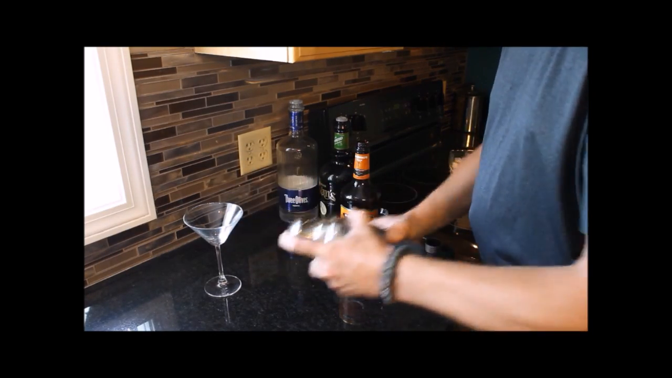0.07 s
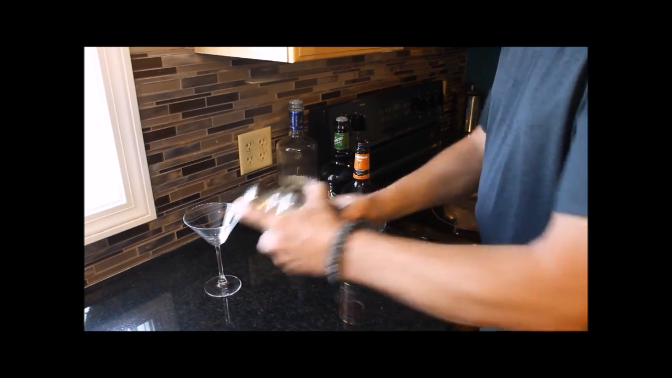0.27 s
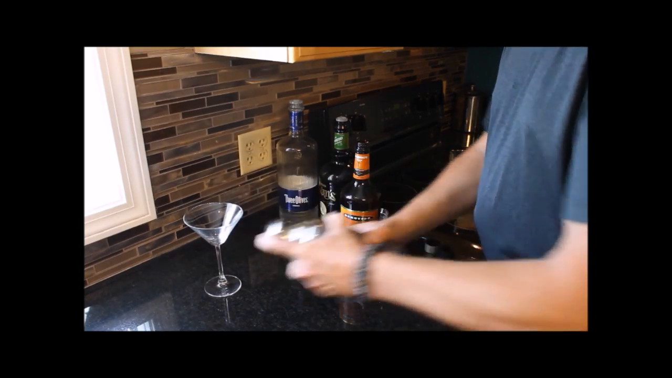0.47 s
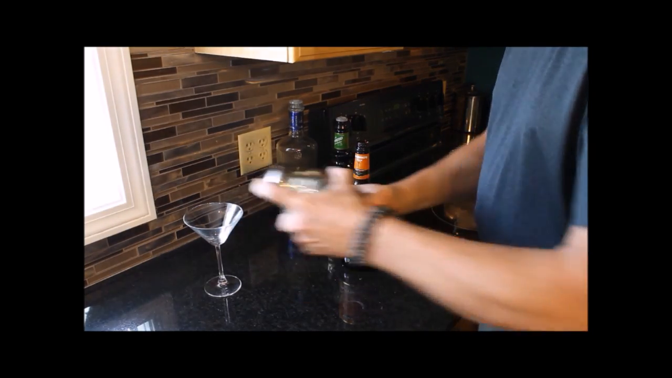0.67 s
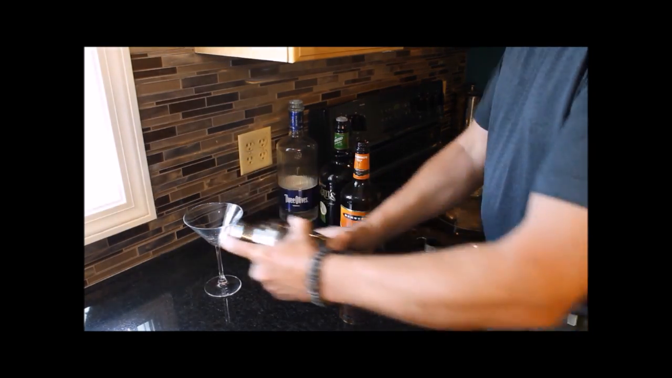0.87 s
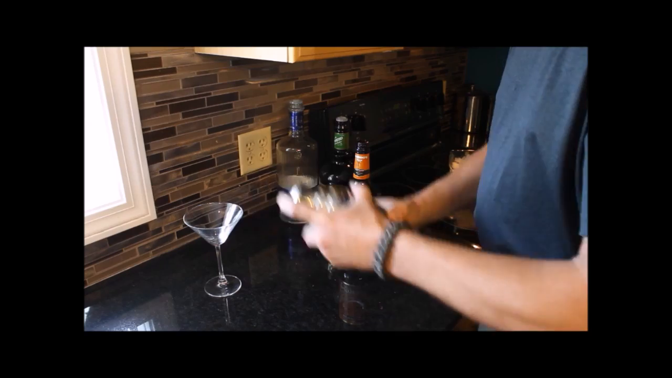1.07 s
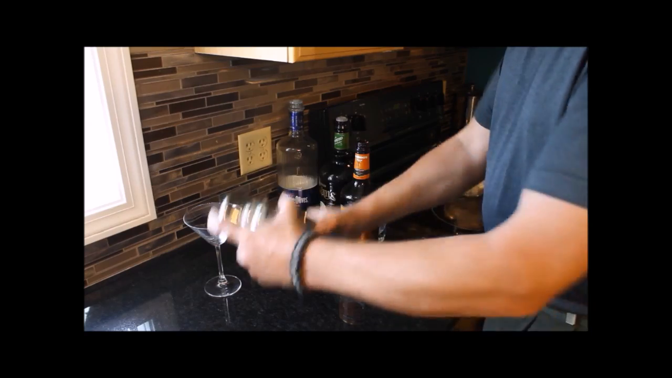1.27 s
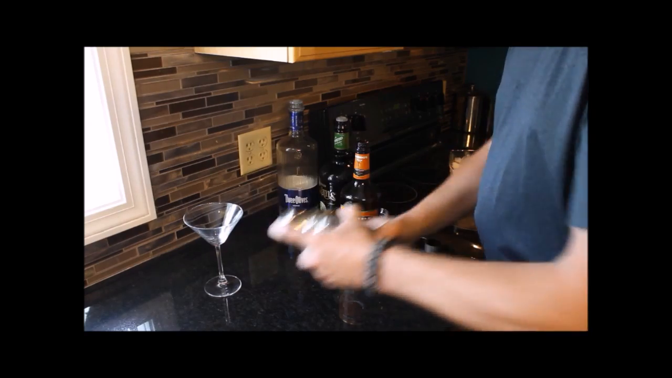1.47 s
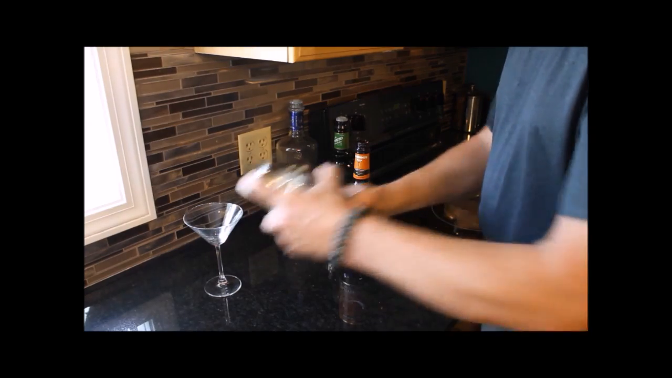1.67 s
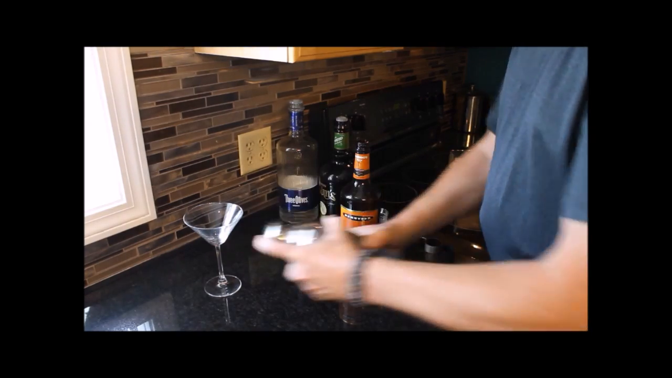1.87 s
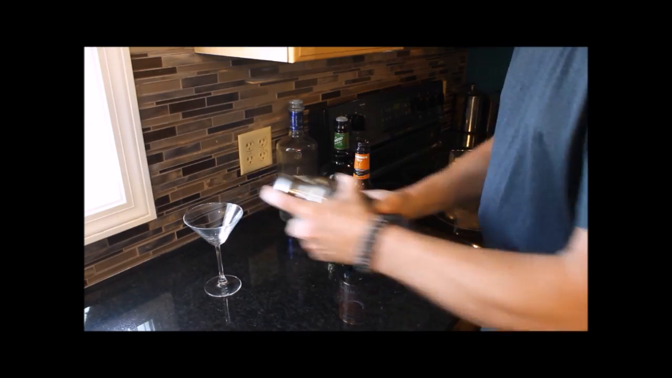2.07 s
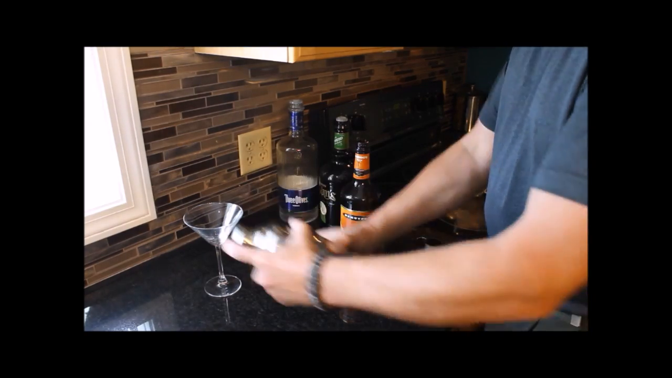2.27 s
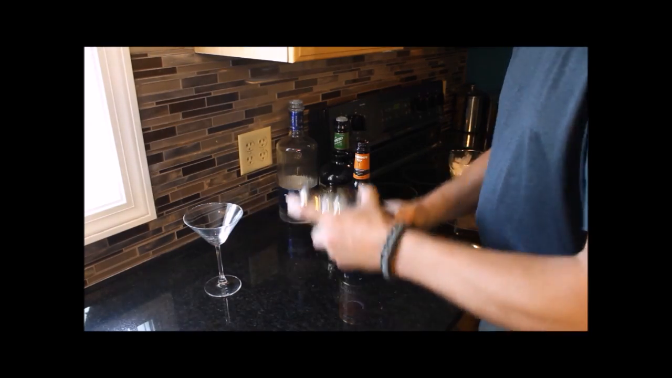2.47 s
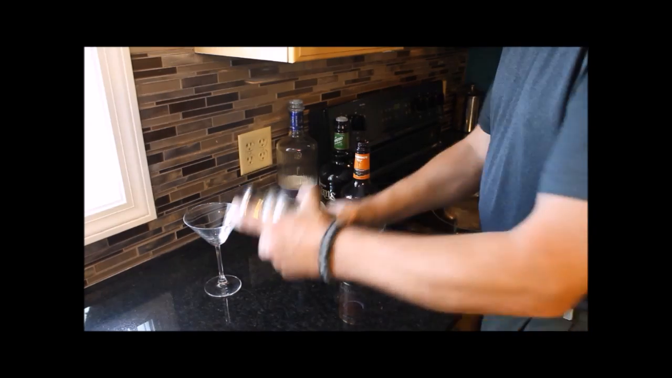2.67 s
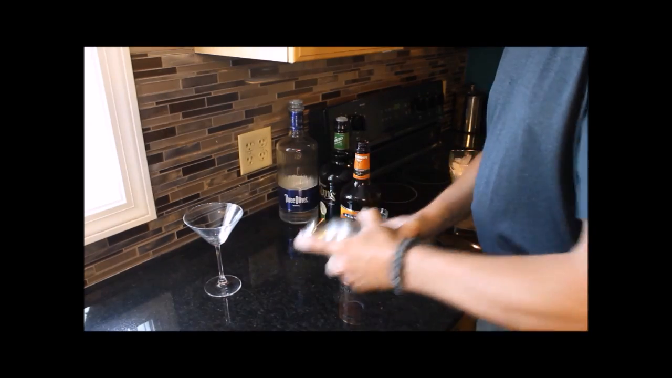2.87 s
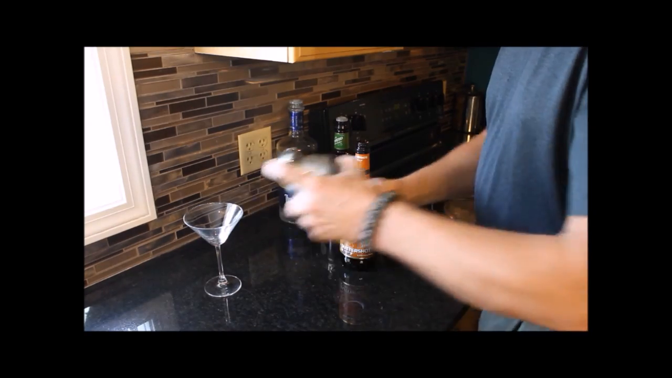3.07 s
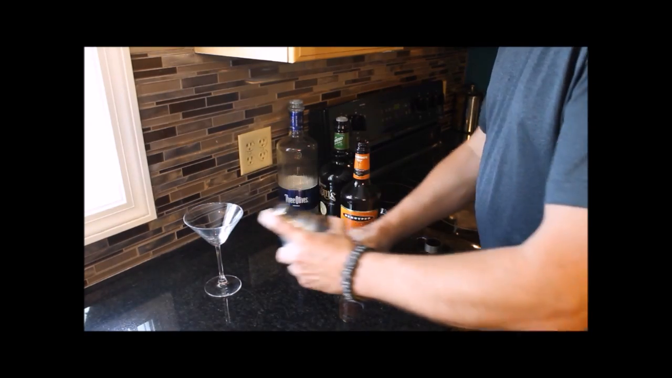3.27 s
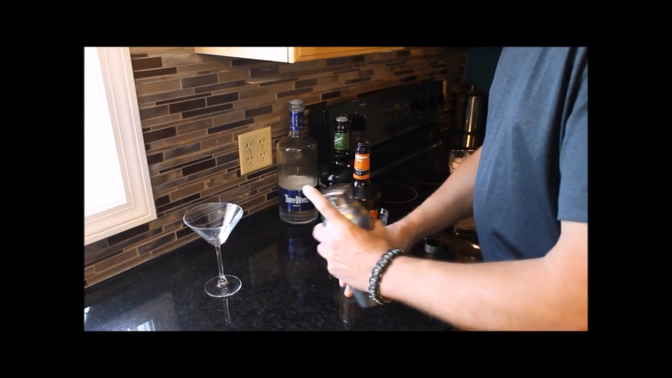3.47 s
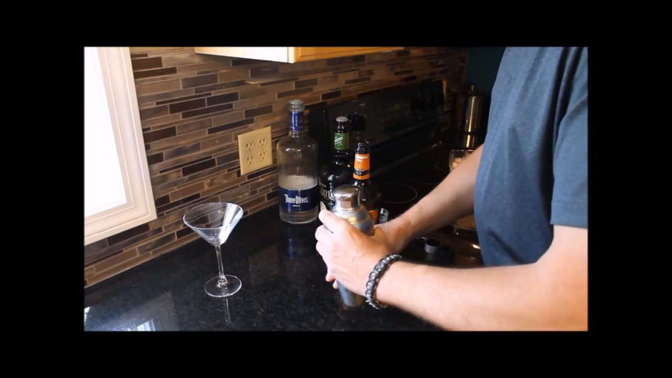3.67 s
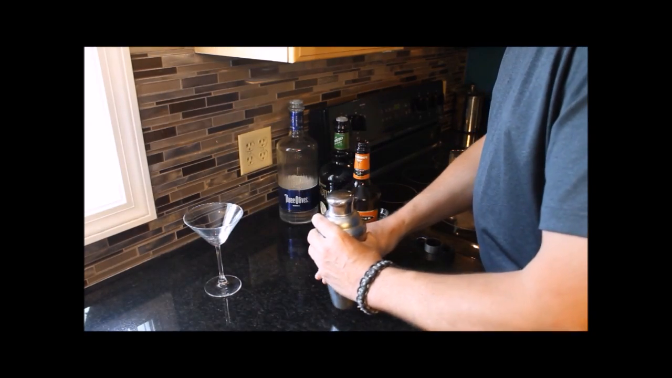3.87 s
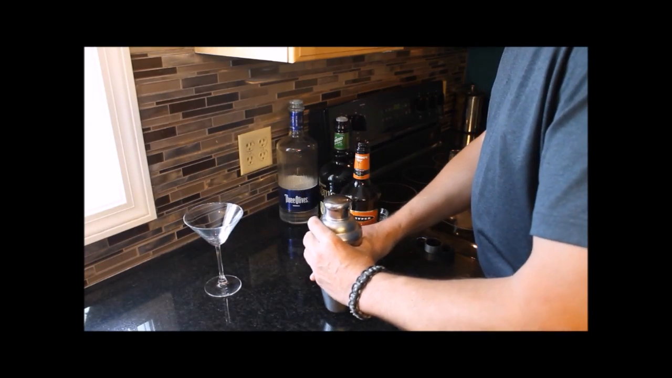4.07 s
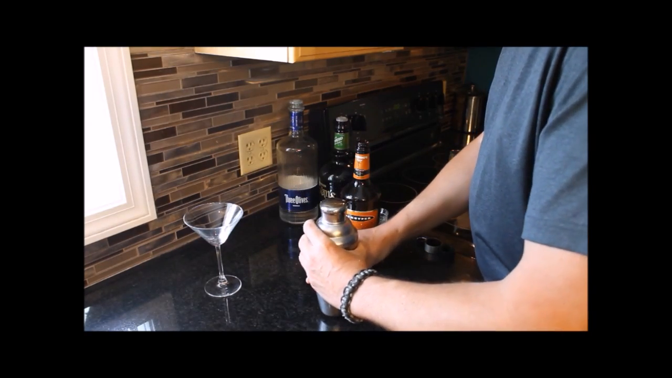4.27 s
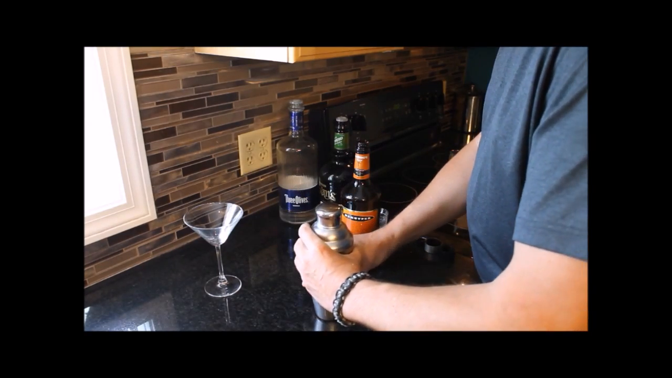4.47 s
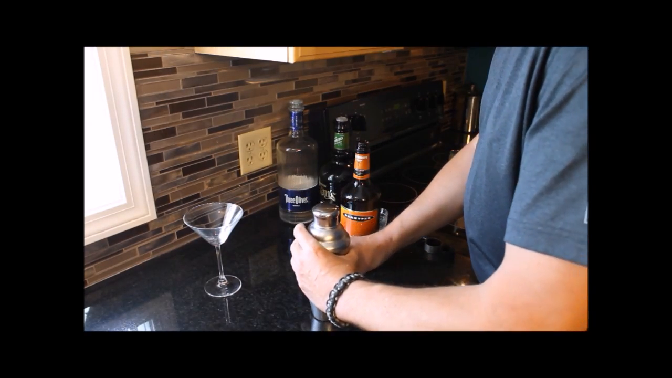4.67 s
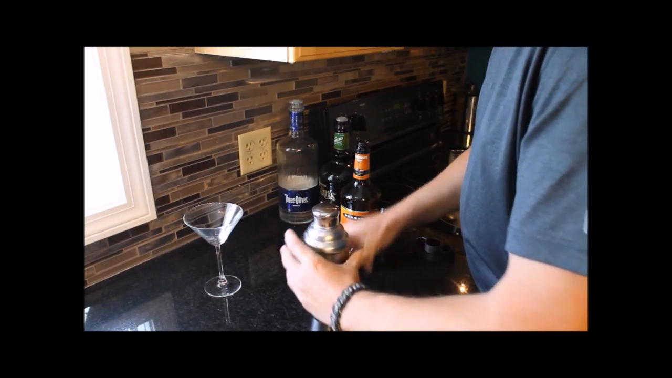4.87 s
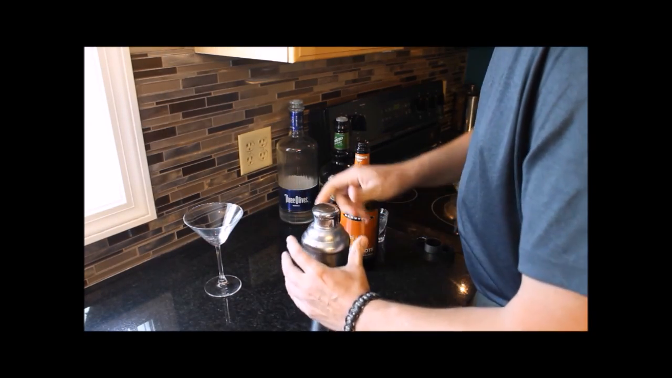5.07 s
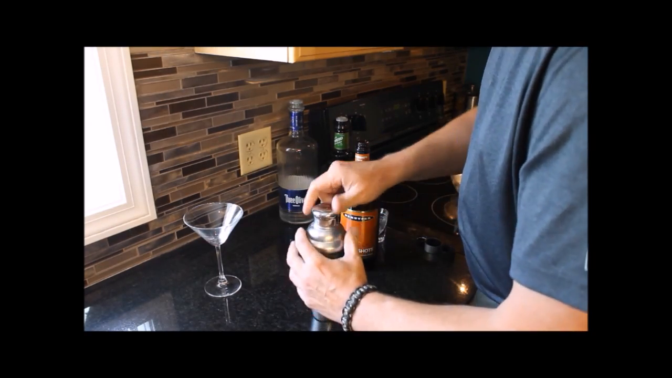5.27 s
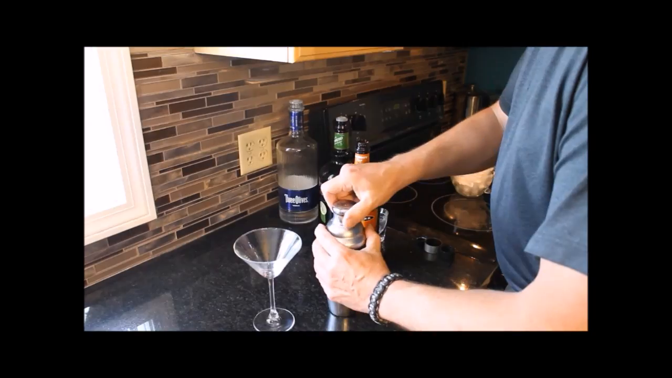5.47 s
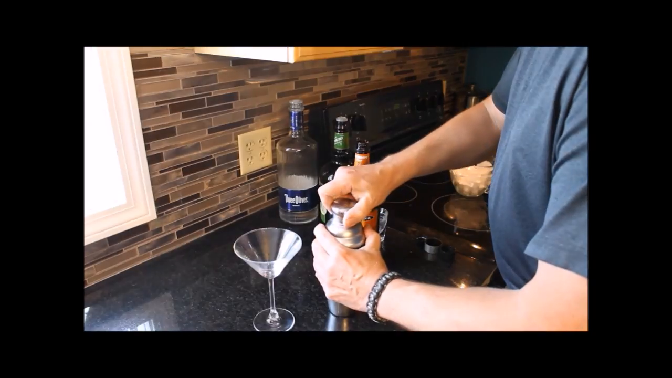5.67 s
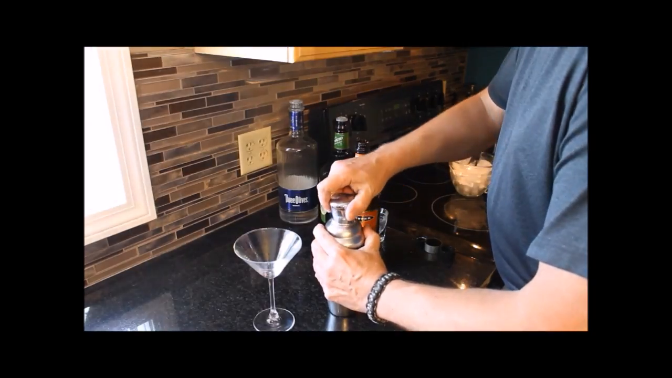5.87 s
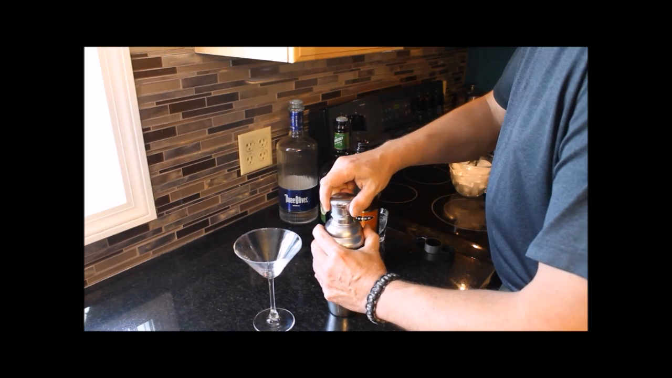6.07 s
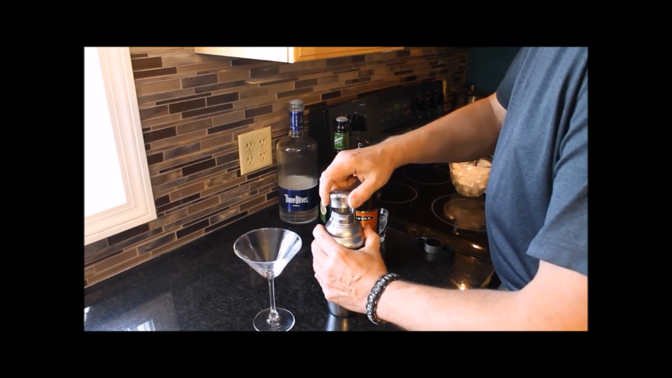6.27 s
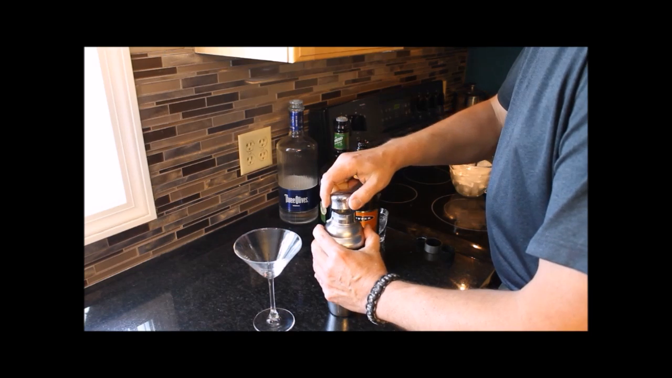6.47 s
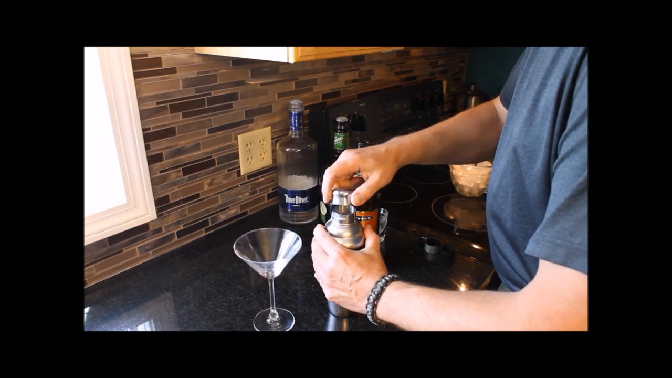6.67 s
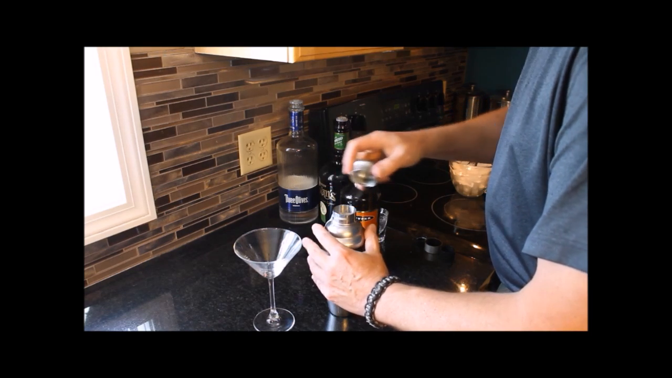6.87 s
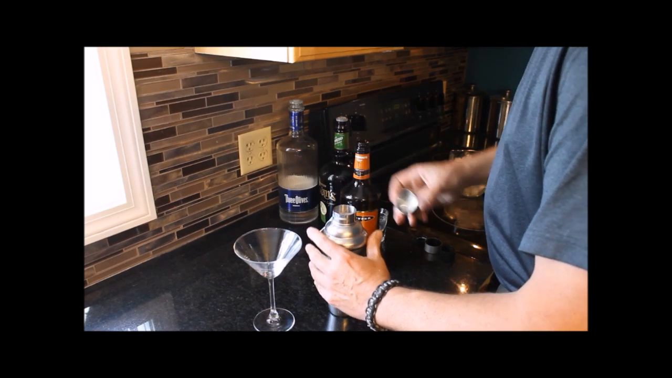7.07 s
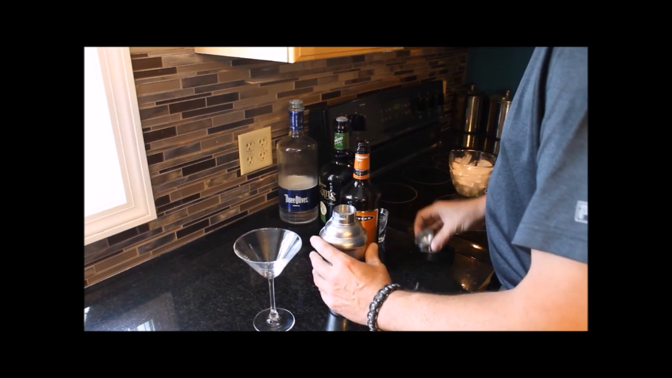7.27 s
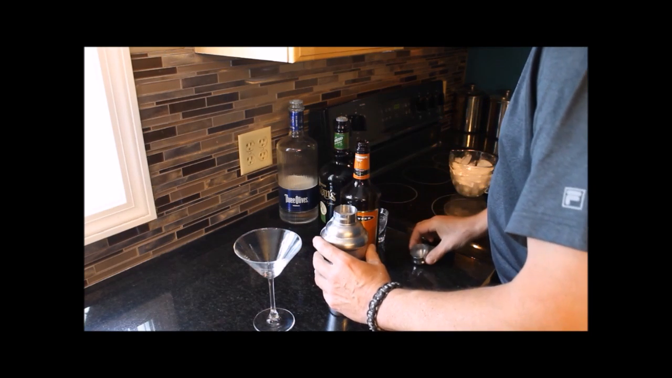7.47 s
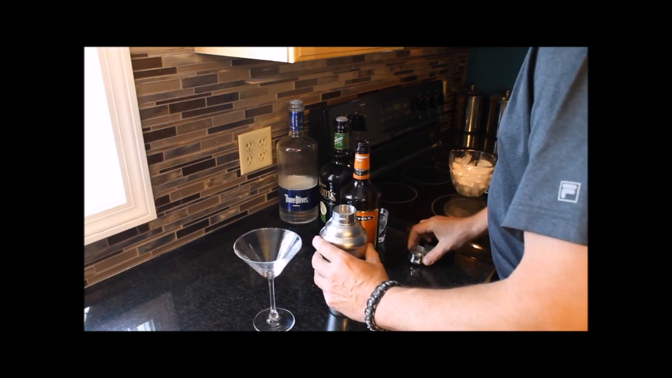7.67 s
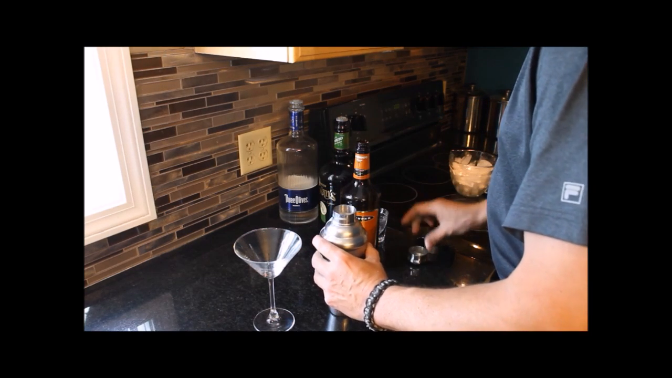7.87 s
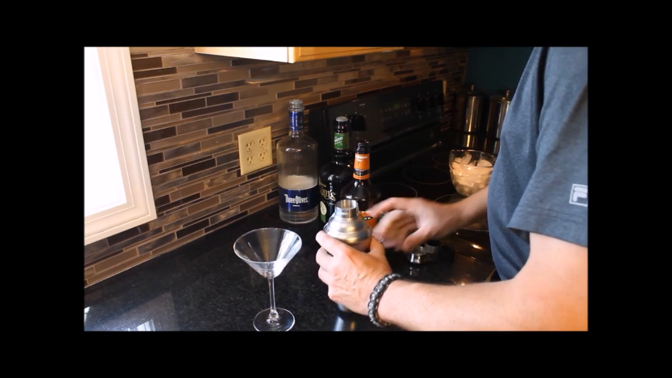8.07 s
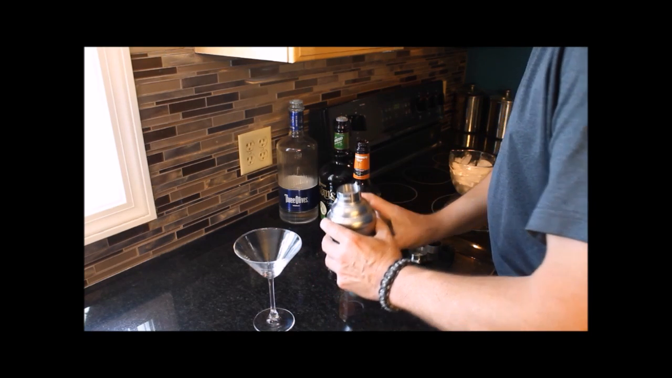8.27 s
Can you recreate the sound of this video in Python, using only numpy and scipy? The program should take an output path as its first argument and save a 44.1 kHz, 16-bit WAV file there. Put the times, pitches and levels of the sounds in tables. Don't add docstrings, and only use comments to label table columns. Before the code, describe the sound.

From the very start until about 3.5 s, ice cubes are thrown back and forth in a hand-held steel cocktail shaker, roughly four or five strokes per second, slightly uneven. Each stroke is a dense crunchy burst: hard clacks, short damped metallic ringing in the middle range, brittle ice cracks and a watery slosh with tiny glugs. From 3.6 to 4.3 s the last cubes settle as faint, muffled ticks while the drink drains. At about 4.6 s the shaker's foot lands on the stone counter with a solid low knock, followed by soft hand rustle and a light bump. Around 5.7-5.95 s the tight cap rubs briefly and clicks loose. It clinks off at 6.5 s; faint fumbling follows near 7.1-7.3 s, then a bright ringing tap at 7.55 s as it meets the stone. A last faint hand rustle comes near 8.1 s. Close microphone, hard kitchen echoes, quiet hush.

```python
import sys
import numpy as np
from scipy import signal
from scipy.fft import rfft, irfft
from scipy.io import wavfile
from scipy.ndimage import uniform_filter1d

SR = 44100
rng = np.random.default_rng(int(sys.argv[2]) if len(sys.argv) > 2 else 0)


def digitize_waveform(pressure):
    field = np.atleast_2d(pressure).T
    bounded = np.clip(field, -1, 1)
    quanta = np.round(bounded * 32767).astype(np.int16)
    wavfile.write(sys.argv[1], SR, quanta)


def magnitude_from_level(level_db):
    exponent = np.asarray(level_db, float) / 20
    return 10 ** exponent


N = 367794

# (arrival [s], hold [s], level [dB], brightness [dB], hand jolt [dB])
STROKES = [(0.0, 0.0067, -22, -4.5, -50), (0.197, 0.045, -21.5, -10, -61), (0.377, 0.037, -30.5, -8.5, -65),
           (.445, 0.051, -23.5, -8, -63), (0.65, 0.062, -22, -11, -75), (0.888, 0.043, -23, -7, -63.5),
           (1.112, 0.048, -20.5, -10.5, -69), (1.364, 0.096, -28.5, -4.5, -54.5),
           (1.596, 0.085, -20.5, -8.5, -57), (1.828, 0.033, -22, -6.5, -42), (1.912, 0.018, -26, -8.5, -48),
           (2.048, 0.062, -21, -9, -75.5), (2.311, .075, -25.5, -4.5, -52), (2.543, 0.067, -21, -8.5, -70),
           (2.774, 0.057, -24, -6, -58), (2.99, 0.052, -20.5, -9.5, -54.5), (3.264, 0.03, -25.5, -4.5, -62),
           (3.449, 0.033, -27.5, -9, -67)]
# (frequency [Hz], level [dB], t60 [s])
SHELL_MODES = [(860, -12, .04), (1085, -9, .04), (1290, -7, .04), (1540, -1, .045), (1640, 0, .04),
               (1780, -2, .04), (1860, -2, .04), (1970, -3, .04), (2300, -8, .03), (2560, -7, .03),
               (3010, -5, .035), (3200, -7, .03), (3540, -7, .035), (4770, -13, .02)]
# (frequency [Hz], density [dB per Hz])
ICE_ON_STEEL = [(300, -44), (500, -18.5), (1000, -15.5), (1580, 5), (2300, -0.5), (3100, 2), (3700, 1),
                (4600, -9), (6200, -11), (8800, -22), (15000, -27.5), (16500, -37)]
# (frequency [Hz], level [dB], t60 [s])
FOOT_MODES = [(225.7, 0.5, 0.09), (430, -5, .07), (730, -5, .08), (859, 0, 0.068), (1100, -9, 0.1),
              (1370, -15, 0.044), (2535, -17, .03), (3510, -20, .03), (4650, -17, .25), (6250, -22, .03)]
# (frequency [Hz], level [dB], t60 [s])
CAP_MODES = [(875, -4, 0.065), (1590, -6, .09), (1760, 3.5, 0.15), (2080, -10, 0.051), (2690, -5, .06),
             (3840, -1.5, 0.051), (4100, -6, 0.046), (4920, -4, 0.067), (5480, -6, 0.052), (6300, -12, .04),
             (7714, -5, .04), (10260, -9, 0.078), (13170, -10, .03)]

RISE_DB_PER_S, FALL_DB_PER_S, LULL_DB = 382, 191.5, -38
REST_S, STILL_S = 3.597, 4.35
GRIP = .03


def evened(x):
    return x / np.sqrt(np.mean(x ** 2) + 1e-20)


def peaked(x):
    return x / abs(x).max()


def high(x, hz):
    return signal.sosfilt(signal.butter(4, hz, "high", fs=SR, output="sos"), x)


def read(points, hz):
    f, value = np.transpose(points)
    return np.interp(np.log(hz + 1), np.log(f + 1), value)


def add(mix, s, sound):
    part = mix[round(s * SR):][:len(sound)]
    part += sound[:len(part)]


def coloured(x, spectrum):
    hz = abs(np.fft.fftfreq(4096, 1 / SR))
    log_gain = np.log(magnitude_from_level(np.maximum(read(spectrum, hz), -100)))
    taps = np.fft.ifft(np.exp(signal.hilbert(log_gain).conj())).real[:2048]
    return signal.oaconvolve(x, taps / np.linalg.norm(taps))[:len(x)]


def ring(modes, spread_db, tilt_db=0., detune=0., size=9000):
    hz, db, t60 = np.transpose(modes)[:, :, None]
    t = np.arange(size) / SR
    strength, pitch = rng.standard_normal((2, len(modes), 1))
    db = db + spread_db * strength + tilt_db * np.log2(hz / 1000)
    waves = magnitude_from_level(db - 60 * t / t60) * np.sin(2 * np.pi * hz * (1 + detune * pitch) * t)
    return peaked(waves.sum(0))


def tick(t60, size=1500):
    burst = 0.62 * rng.standard_normal(size) * magnitude_from_level(-60 * np.arange(size) / SR / t60)
    burst[0] = 1
    return burst


def strokes(db, before, after, lull_db):
    abrupt, settle_db_per_s = .7, 102
    t = np.arange(round(STILL_S * SR)) / SR
    start, hold, _, bright_db = np.transpose(STROKES)[:4, :, None]
    steep = magnitude_from_level(abrupt * (bright_db + 8.0))
    rise = before * steep * np.maximum(start - t, 0)
    fall = after * np.maximum(t - start - hold, 0)
    each = db[:, None] - rise - fall
    lull = lull_db - settle_db_per_s * np.maximum(t - REST_S, 0)
    level = 10 * np.log10((magnitude_from_level(each) ** 2).sum(0) + magnitude_from_level(lull) ** 2)
    return np.pad(level, (0, N - len(t)), constant_values=-200)


def throw():
    return strokes(np.transpose(STROKES)[2], RISE_DB_PER_S, FALL_DB_PER_S, LULL_DB)


def cube(size=500):
    pitches = np.exp(rng.uniform(np.log(800), np.log(9500), 3))
    modes = [(hz, 0, 13.0 / hz ** 0.73) for hz in pitches]
    return 1.7 * tick(.012, size=size) + ring(modes, 4.1, size=size)


def rattle():
    per_s, uneven_db, patches = 450, 2.6, 26
    end = round(STILL_S * SR)
    hit = rng.random(end) < per_s / SR
    size = magnitude_from_level(uneven_db * np.minimum(rng.exponential(1, end), 2.2)) * hit

    turn = np.searchsorted(np.transpose(STROKES)[0] - .05, np.arange(end) / SR)
    favoured = rng.integers(0, patches, len(STROKES) + 1)[turn]
    patch = (rng.integers(0, patches // 2, end) + favoured) % patches
    steel, ice = np.zeros(N), np.zeros(N)
    for k in range(patches):
        hits = size * (patch == k)
        shell = ring(SHELL_MODES, 4, detune=GRIP, size=3000)
        steel[:end] += signal.oaconvolve(hits, shell)[:end]
        ice[:end] += signal.oaconvolve(hits, cube())[:end]

    ice = evened(coloured(ice, ICE_ON_STEEL))
    treble = signal.sosfilt(signal.butter(2, 4500, "high", fs=SR, output="sos"), ice)
    splinters = evened(high(coloured(rng.standard_normal(N), ICE_ON_STEEL), 4500))
    body = magnitude_from_level(-14.0) * evened(high(steel, 650)) + magnitude_from_level(-4.5) * (ice - treble)
    bright = evened(evened(treble) + 0.52 * splinters)

    dull_before, dull_after, lull_bright_db = 250, 39, -15.5
    db, bright_db = np.transpose(STROKES)[2:4]
    sharp = strokes(db + bright_db, RISE_DB_PER_S + dull_before, FALL_DB_PER_S + dull_after,
                    LULL_DB + lull_bright_db)
    return magnitude_from_level(throw()) * body + magnitude_from_level(sharp + 1.5) * bright


def drink_rush():
    # (frequency [Hz], density [dB per Hz])
    flow_colour = [(100, -42.5), (200, -12), (320, -9), (420, -11.5), (550, -2.5), (800, -1), (1100, 5),
                   (1600, -27.5), (2600, -72)]
    flow_level_db, ice_share, lag_s, drain_db, drain_s = -52, 0.64, 0.0067, 18.5, 0.63
    t = np.arange(N) / SR
    level = np.interp(t - lag_s, t, throw()) - LULL_DB
    drain = drain_db * np.clip((t - REST_S) / drain_s, 0, 1)
    flow_db = flow_level_db + ice_share * level + drain
    return evened(coloured(rng.standard_normal(N), flow_colour)) * magnitude_from_level(flow_db)


def jolts():
    # (frequency [Hz], density [dB per Hz])
    pack_colour = [(120, -17), (200, -5), (300, 1), (420, -8.5), (800, -31)]
    lag_s, rumble_db, thud_db, thud_t60 = 0.0067, -87, -10, .2
    jolt_s, jolt_place, jolt_hz = 0.0056, .35, 65.05
    t = np.arange(N) / SR
    level = np.interp(t - lag_s, t, throw()) - LULL_DB
    band = signal.butter(2, [45, 130], "band", fs=SR, output="sos")
    out = evened(signal.sosfilt(band, rng.standard_normal(N))) * magnitude_from_level(rumble_db + .4 * level)
    for s, hold, ice_db, bright_db, jolt_db in STROKES:
        thud = peaked(coloured(tick(thud_t60, size=6000), pack_colour))
        add(out, s, magnitude_from_level(thud_db + ice_db + 1.6 * bright_db) * thud)
        u = (t - s - jolt_place * hold) / jolt_s
        bell = np.exp(-np.minimum(u ** 2, 50) / 2)
        out += magnitude_from_level(jolt_db - 7.0) * np.cos(2 * np.pi * jolt_hz * jolt_s * u) * bell
    return out


def room_hush():
    # (frequency [Hz], density [dB per Hz])
    hush_colour = [(15, -39.5), (25, -15.5), (170, -6.5), (256, -3), (451, -4), (560, -7), (988, -6.5),
                   (1160, -8.5), (1610, -10.5), (3160, -13.5), (16000, -27)]
    return magnitude_from_level(-65) * evened(coloured(rng.standard_normal(N), hush_colour))


def kitchen(x):
    # (frequency [Hz], t60 [s])
    decay = [(150, 0.22), (500, 0.46), (2000, 0.43), (6000, 0.35), (14000, 0.16)]
    # (delay [s], level [dB])
    early = [(.0021, -4), (.0044, -7), (.0087, -6), (.0112, -8), (.0138, -7), (.0172, -10), (.0205, -9),
             (.0268, -12)]
    taps = np.zeros(SR // 2)
    at = np.arange(300, len(taps) - 20, 20)
    taps[at + rng.integers(0, 20, len(at))] = rng.choice([-1., 1.], len(at))
    hz, t, z = signal.stft(taps, SR, nperseg=128)
    dying = z * magnitude_from_level(-60 * t / read(decay, hz)[:, None])
    tail = signal.istft(dying, SR, nperseg=128)[1]
    tail = magnitude_from_level(2.5) * tail / np.linalg.norm(tail)
    for k, (s, db) in enumerate(early):
        add(tail, s, (-1) ** k * magnitude_from_level(db) * np.hanning(6)[1:-1] / 2)
    return signal.fftconvolve(x, tail)[:N]


def pings():
    # (time [s], peak [dB], frequency [Hz])
    wall = [(0.0393, -16, 1640), (0.1316, -16, 1294), (0.181, -15, 1607), (0.2698, -14, 1640),
            (0.3287, -20.5, 1800), (0.377, -9.5, 1650), (0.4259, -15.5, 1680), (0.4444, -12.5, 2000),
            (0.5926, -19, 1850), (0.6769, -10.5, 1760), (0.7811, -14, 1670), (0.8135, -18.5, 1835),
            (0.84, -17, 2870), (0.8535, -14, 1826), (0.8864, -11, 1610), (0.9712, -15, 1660),
            (1.0326, -26, 1510), (1.0705, -22, 2320), (1.0745, -20, 1100), (1.1154, -10.5, 1625),
            (1.2605, -25, 1530), (1.3214, -15, 1580), (1.3653, -11.5, 2100), (1.3853, -8, 3260),
            (1.5105, -20, 1650), (1.5668, -15.5, 1300), (1.6327, -10.5, 1820), (1.704, -13, 1630),
            (1.7789, -19, 1610), (1.8108, -15.5, 1640), (1.8342, -8.5, 1800), (1.92, -6.5, 1970),
            (2.0308, -13, 2030), (2.0662, -8.5, 1870), (2.1505, -14.5, 1640), (2.2418, -22, 1750),
            (2.2737, -19, 1800), (2.3037, -10.5, 3610), (2.3286, -13.5, 1990), (2.4024, -17.5, 3250),
            (2.4443, -23, 1700), (2.4967, -15.5, 2270), (2.5182, -17, 1510), (2.5326, -12.5, 1670),
            (2.7282, -15.5, 1760), (2.7591, -10.5, 3250), (2.7931, -8, 1730), (2.8345, -13.5, 3480),
            (2.8759, -16.5, 1750), (2.9213, -18.5, 3600), (2.9652, -14.5, 2100), (2.9961, -12, 1880),
            (3.0954, -19, 1570), (3.1507, -14.5, 1760), (3.2056, -26.5, 1730), (3.262, -8.5, 3550),
            (3.4261, -16.5, 3500), (3.455, -19, 2400), (3.5184, -23, 2000), (3.6336, -28, 1780)]
    # (time [s], peak [dB], frequency [Hz], t60 [s])
    lid = [(1.385, -27, 5130, 0.04), (1.386, -24, 8800, .07), (1.439, -25.5, 6400, 0.029),
           (1.816, -30, 9630, .06), (1.883, -18.5, 8780, 0.043), (2.067, -27.5, 6164, .04),
           (2.303, -22, 12550, 0.051), (2.56, -24.5, 6250, 0.089), (2.754, -24, 8700, 0.046),
           (.49, -23, 6350, .04), (0.97, -27, 8790, .03)]
    wall_db, wall_t60, pair_ratio = -8, 0.036, 1.2
    out, t = np.zeros(N), np.arange(4000) / SR
    for s, db, hz, t60 in [(s, db + wall_db, hz, wall_t60) for s, db, hz in wall] + lid:
        neighbour_hz = hz * pair_ratio ** rng.uniform(-0.89, 1)
        pair = np.sin(2 * np.pi * hz * t) + 0.28 * np.sin(2 * np.pi * neighbour_hz * t)
        add(out, s, magnitude_from_level(db - 60 * t / t60) * pair)
    return out


def knocks():
    # (time [s], peak [dB], crack relative to peak [dB])
    lone = [(.04, -12.5, -7), (0.131, -19, -14), (.78, -15, -15), (0.814, -19, -7.5), (.97, -7, -18.5),
            (1.057, -19, -11.5), (1.322, -10, -15.5), (1.355, -8, -12.5), (1.481, -18, -17.5),
            (1.51, -24.5, -19), (1.778, -20.5, -12.5), (2.151, -19, -22), (2.274, -14, -12.5),
            (2.444, -19.5, -18.5), (2.497, -10, -11.5), (2.669, -21, -5.5), (2.728, -13, -19.5),
            (2.754, -9, -17), (2.835, -16, -0.5), (2.921, -13, -7.5), (2.965, -16.5, -7.5),
            (3.15, -11.5, -16), (3.249, -14.5, -5.5), (3.425, -12, -18), (3.519, -19.5, -4.5),
            (3.634, -16, -31), (.593, -17.5, -18), (2.243, -22.5, -18.5), (3.206, -23, -12.5),
            (3.38, -27, -2)]
    # (time [s], peak [dB])
    whole = [(0.184, -12), (0.201, -10), (.272, -11.5), (.377, -2.5), (.444, -2.5), (.63, -18),
             (0.652, -14.5), (.677, -10.5), (0.854, -5.5), (.885, -7.5), (1.115, -4), (1.366, -5.5),
             (1.388, -11), (1.568, -14.5), (1.633, -6.5), (1.703, -13), (1.81, -10), (1.834, -2.5),
             (1.92, -4.5), (2.031, -7.5), (2.065, -1), (2.306, -10.5), (2.33, -9.5), (2.532, -16.5),
             (2.559, -3), (2.76, -6), (2.792, -5.5), (2.996, -9), (3.053, -8), (3.262, -5.5), (.329, -19.5),
             (.426, -16), (.468, -12), (1.033, -24), (2.113, -11.5), (2.343, -14), (2.403, -19),
             (2.518, -16), (2.635, -16), (2.876, -18.5), (3.033, -13), (3.096, -16.5), (3.31, -15.5),
             (3.454, -16)]
    # (time [s], peak [dB])
    settling = [(3.678, -27), (3.735, -37), (3.825, -34), (3.859, -31), (3.992, -43), (4.069, -41),
                (4.116, -45), (4.15, -48), (4.268, -48)]
    # (time [s], peak [dB])
    snaps = [(0.2054, -18.5), (0.2366, -19), (0.3672, -17), (0.377, -20), (0.4403, -17.5), (0.4906, -12),
             (0.691, -11), (0.8913, -14.5), (0.8998, -17.5), (0.9716, -20), (1.115, -17.5), (1.1558, -18.5),
             (1.385, -3), (1.4398, -18.5), (1.6053, -18.5), (1.6457, -18.5), (1.6756, -15.5), (1.8165, -13),
             (1.8432, -9), (1.8836, -7), (1.9206, -18.5), (2.068, -23), (2.3037, -13.5), (2.3413, -20.5),
             (2.363, -7), (2.5572, -16), (2.7587, -7), (2.9886, -23.5), (3.02, -15.5), (3.262, -14),
             (.8405, -24), (2.0293, -24), (2.7515, -16), (3.2839, -21), (3.4506, -24), (.729, -25),
             (2.876, -24.5), (3.845, -46), (1.19, -25.5), (1.558, -27)]
    # (frequency [Hz], level [dB], t60 [s])
    lid_modes = [(5250, -3, .05), (8770, -1, .045), (9630, -4, .06), (12600, -8, .03)]
    steel, ice = np.zeros(N), np.zeros(N)
    for s, db, *_ in lone + whole + settling:
        contact = tick(0.011, size=3000) + 0.77 * tick(0.1, size=3000)
        body = peaked(coloured(contact, ICE_ON_STEEL))
        shell = ring(SHELL_MODES, 6, detune=GRIP, size=3000)
        add(steel, s, magnitude_from_level(db - 7.0) * (0.15 * shell + 0.89 * body))

    sunk = signal.sosfilt(signal.butter(2, 2600, fs=SR, output="sos"), steel)
    steel = np.where(np.arange(N) / SR < settling[0][0], steel, 1.68 * sunk)

    for s, db in snaps + [(s, db + crack_db) for s, db, crack_db in lone]:
        snap = tick(.008, size=3000) + 0.26 * tick(0.068, size=3000)
        add(ice, s, magnitude_from_level(db + 1.0) * (snap + 0.19 * ring(lid_modes, 4.4, size=3000)))
    snap_colour = [(2000, 7.0), (6000, 3.0), (8770, 1.5), (10500, -4.5), (16000, -14.5)]
    return high(steel, 500) + coloured(high(ice, 2000), snap_colour)


def glugs():
    # (time [s], level [dB], frequency [Hz], length [s])
    pockets = [(0.127, -22, 1300, 0.026), (1.072, -21.5, 1104, 0.015), (1.563, -19, 1266, 0.017),
               (1.581, -25.5, 893, 0.028), (2.033, -21.5, 1110, 0.011), (1.434, -32.5, 1340, 0.022),
               (1.511, -23.5, 1605, 0.015), (2.055, -29.5, 850, .03), (1.813, -26.5, 1134, .025),
               (3.01, -27.5, 850, .015), (3.052, -29.5, 1001, .025), (3.465, -31, 836, .03),
               (.125, -29, 2400, .02)]
    out = np.zeros(N)
    for s, db, hz, length in pockets:
        u = np.arange(0, length, 1 / SR)
        add(out, s, magnitude_from_level(db) * np.sin(np.pi * u / length) * np.sin(2 * np.pi * hz * u))
    return out


def impacts(blows, colour, modes):
    # (delay [s], share)
    rebounds = [(.005, 0.74), (0.0137, 0.71)]
    out = np.zeros(N)
    for s, db, ring_db, tilt_db in blows:
        tilt_db = min(tilt_db, 6)
        tilted = [(hz, level + tilt_db * np.log2(hz / 1000)) for hz, level in colour]
        contact = 0.56 * tick(0.0036, size=2500) + 0.43 * tick(.055, size=2500)
        for lag_s, share in rebounds:
            add(contact, lag_s, share * tick(0.0034, size=1500))
        add(out, s, magnitude_from_level(db + 2.5) * peaked(coloured(contact, tilted)))
        add(out, s, magnitude_from_level(db + ring_db) * ring(modes, 1.5, tilt_db, detune=0.002))
    return out


def shaker_set_down():
    # (time [s], peak [dB], ring [dB], tilt [dB per octave])
    blow = [(4.5735, -19.5, -7.5, 0)]
    # (frequency [Hz], density [dB per Hz])
    foot_colour = [(70, -31), (140, -13.5), (226, 4), (400, 0.5), (570, 1), (800, -0.5), (1200, -6),
                   (2000, -19), (4000, -27.5), (8000, -35), (16000, -52.5)]
    return impacts(blow, foot_colour, FOOT_MODES)


def palms():
    # (time [s], length [s], level [dB])
    fumbles = [(4.62, .25, -62), (5.55, .12, -66), (5.84, .14, -60), (7.11, .16, -60), (7.3, .16, -62),
               (8.1, .2, -63)]
    # (frequency [Hz], density [dB per Hz])
    palm_colour = [(90, -16), (200, 0), (450, -1), (900, -5), (1600, -16), (4000, -30), (16000, -60)]
    noise, lumps = rng.standard_normal((2, N))
    t, level = np.arange(N) / SR, np.zeros(N)
    for s, length, db in fumbles:
        level += magnitude_from_level(db) * np.sin(np.pi * np.clip((t - s) / length, 0, 1) ** .6)
    lumpy = magnitude_from_level(3.0 * evened(uniform_filter1d(lumps, size=900)))
    return level * lumpy * evened(coloured(noise, palm_colour))


def nudges():
    # (time [s], peak [dB], ring [dB], tilt [dB per octave])
    thuds = [(4.838, -40.5, -25, 0.5), (5.58, -50, -30, 1.5), (5.762, -49, -29, 0.5),
             (7.117, -42.5, -34, -2), (7.22, -51, -26, 1), (7.341, -46.5, -35, -2),
             (8.119, -51.5, -24.5, -3)]
    # (frequency [Hz], density [dB per Hz])
    nudge_colour = [(90, -25), (200, 0.5), (320, 3), (700, -2.5), (1300, -8), (3000, -31), (16000, -56)]
    return impacts(thuds, nudge_colour, FOOT_MODES)


def cap_twists():
    # (time [s], peak [dB], ring [dB], tilt [dB per octave])
    jerks = [(4.854, -45.5, -33, -1.5), (5.438, -54.5, -33.5, -1), (5.715, -46, -17, 0.5),
             (5.86, -45.5, -12, 6), (5.908, -32.5, -16, 1), (5.936, -27, -11, -1), (6.131, -46, -8, 3)]
    # (frequency [Hz], density [dB per Hz])
    twist_colour = [(240, -29), (400, -19), (655, -11), (1270, -2.5), (2400, -7), (2900, -12.5),
                    (4110, -6.5), (5500, -15), (10500, -31.5), (16000, -40)]
    return impacts(jerks, twist_colour, CAP_MODES)


def cap_rub():
    # (time [s], level [dB])
    slide = [(5.7, -84.5), (5.718, -55.5), (5.796, -56.5), (5.846, -75), (5.864, -56), (5.9, -104.5)]
    # (frequency [Hz], density [dB per Hz])
    rub_colour = [(290, -6), (500, -6), (1130, -4.5), (2160, -13), (2390, -9), (3020, -13), (6330, -13),
                  (16000, -25)]
    t = np.arange(N) / SR
    slips = rng.standard_normal(N) * (0.8 + 2.5 * (rng.random(N) < 700 / SR))
    times, db = np.transpose(slide)
    on = (t > times[0]) & (t < times[-1])
    ringing = signal.oaconvolve(slips, ring(CAP_MODES, 0.36))[:N]
    rub = evened(coloured(slips, rub_colour)) + 0.2 * evened(ringing)
    return on * magnitude_from_level(np.interp(t, times, db)) * rub


def cap_lifted():
    # (time [s], peak [dB], ring [dB], tilt [dB per octave])
    clinks = [(6.527, -28.5, -2.5, 0.0093), (7.464, -59, -14, 0.0072)]
    # (frequency [Hz], density [dB per Hz])
    clink_colour = [(300, -31.5), (500, -9), (900, -1), (1300, -1.5), (1750, 8.5), (2300, -5), (3000, -5),
                    (3900, -7), (5300, -9.5), (7000, -20), (16000, -29.5)]
    return impacts(clinks, clink_colour, CAP_MODES)


def cap_put_down():
    # (time [s], peak [dB], ring [dB], tilt [dB per octave])
    blow = [(7.548, -22, -1, 0.0085)]
    # (frequency [Hz], density [dB per Hz])
    stone_colour = [(200, -29), (400, -28.5), (1000, -15), (1500, -13), (2200, 3), (2700, -6), (3500, -9.5),
                    (5400, -14), (7000, -29), (16000, -27)]
    # (frequency [Hz], level [dB], t60 [s])
    resting_modes = [(1770, -3, .09), (1920, 1, .09), (2202, 5, 0.13), (2385, 0, 0.12), (3058, -8, 0.086),
                     (3540, -3, .1), (4260, -9.5, 0.065), (4750, -6, .08), (5270, -1, 0.068),
                     (6400, -17, .04), (10280, 0, 0.13), (9950, -14, .1)]
    return impacts(blow, stone_colour, resting_modes)


def scene():
    cap = cap_twists() + cap_rub() + cap_lifted() + cap_put_down()
    hands = high(shaker_set_down() + nudges() + cap, 136)
    shaker = high(rattle() + drink_rush() + pings() + knocks() + glugs(), 250)
    echoes = kitchen(magnitude_from_level(-16.0) * shaker + magnitude_from_level(-8.5) * hands)
    return (shaker + hands + echoes + jolts() + room_hush() + palms())[None]


def thinned(x):
    # (centre [s], length [s], highest [Hz], lowest [Hz] if the bass goes too)
    thin_moments = [(.178, .022, 5600), (.624, .02, 6000), (1.21, .02, 9000), (1.266, .03, 5200),
                    (1.534, .025, 9000), (1.584, .03, 8000), (1.825, .025, 10000), (1.971, .025, 5600),
                    (2.048, .028, 7600, 750), (2.17, .02, 6000), (3.718, .025, 5000), (3.869, .025, 4000),
                    (3.974, .025, 9200), (4.103, .028, 6800), (4.147, .028, 7200), (4.273, .052, 8000),
                    (4.893, .028, 5200), (4.987, .028, 4800), (5.967, .048, 7700, 450), (6.154, .028, 5800),
                    (6.203, .025, 5800), (6.622, .028, 5400), (6.792, .028, 5500), (7.177, .028, 4400),
                    (7.217, .028, 4400), (7.268, .025, 7200), (7.688, .028, 5600), (7.794, .028, 6300),
                    (7.844, .028, 6000)]
    grain_hz = 1900
    out = x.copy()
    for s, length, top_hz, *low_hz in thin_moments:
        low = sum(low_hz)
        first, size = round((s - length / 2) * SR), round(length * SR)
        fade = np.sqrt(signal.windows.tukey(size, min(1400 / size, 1)))
        z = rfft(x[first:first + size] * fade)
        hz, kept = np.fft.rfftfreq(size, 1 / SR), np.zeros_like(z)
        band = np.floor(4.5 * np.log2(1 + hz / 600))
        for b in np.unique(band[(hz < top_hz) & (hz >= low)]):
            bins = np.flatnonzero(band == b)
            best = bins[np.argmax(abs(z[bins]))]
            kept[best] = z[best] / abs(z[best]) * np.linalg.norm(z[bins])
        kept = np.where((hz < grain_hz) & (hz >= low), z, kept)
        change = irfft(kept, size) - fade * x[first:first + size]
        out[first:first + size] += 0.95 * fade * change
    return out


def band_limit(x):
    return signal.sosfilt(signal.butter(12, 16520, fs=SR, output="sos"), x)


def record(dry):
    ceiling, edge_hz = .62, 15950
    soft = ceiling * np.tanh(dry[0] / ceiling)
    edge = signal.firwin2(801, [0, edge_hz, edge_hz + 120, SR / 2], [1, 1, .08, .08], fs=SR)
    mix = thinned(signal.oaconvolve(soft, edge, "same"))[None]
    return band_limit(mix)


dry = scene()
out = record(dry)
digitize_waveform(out)
```